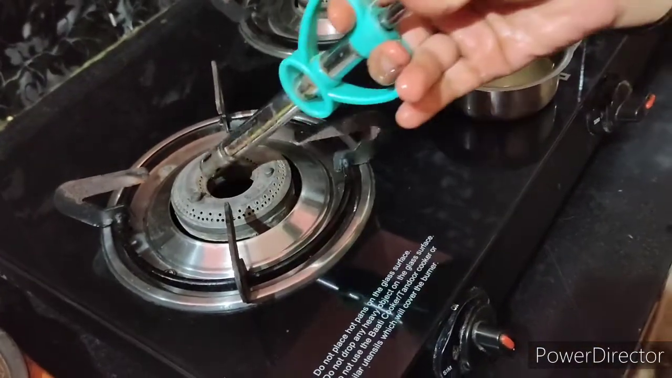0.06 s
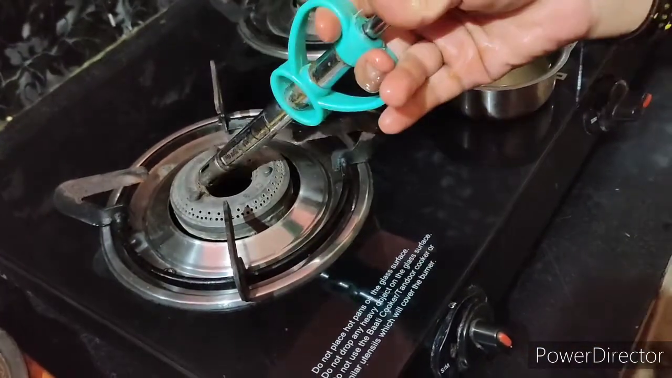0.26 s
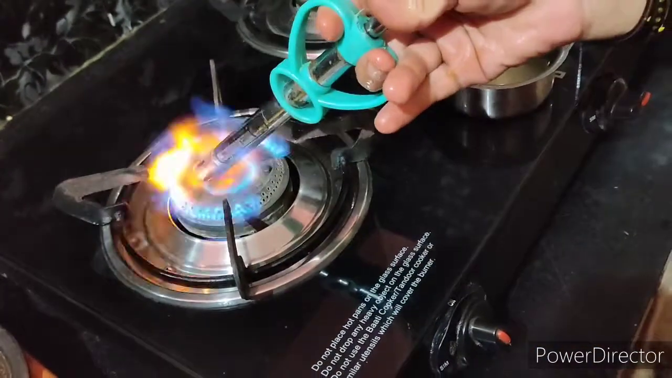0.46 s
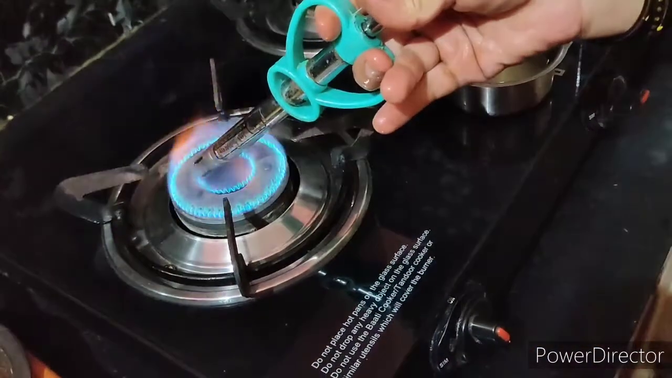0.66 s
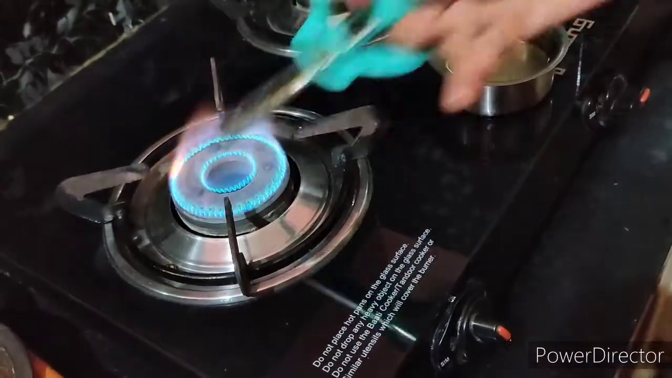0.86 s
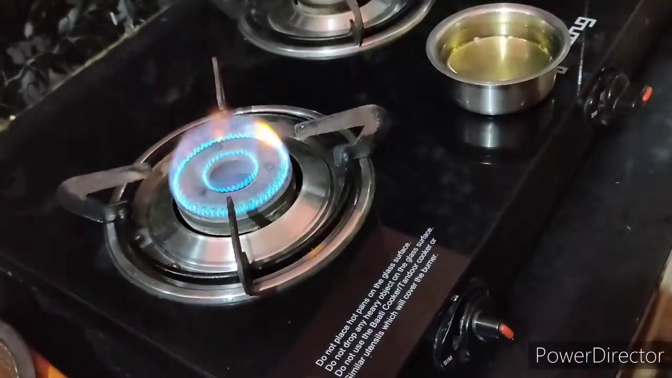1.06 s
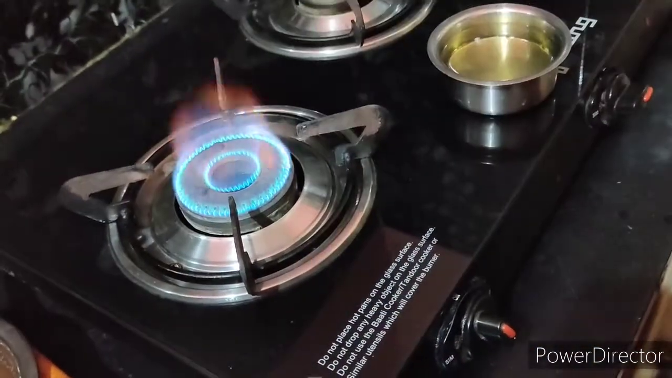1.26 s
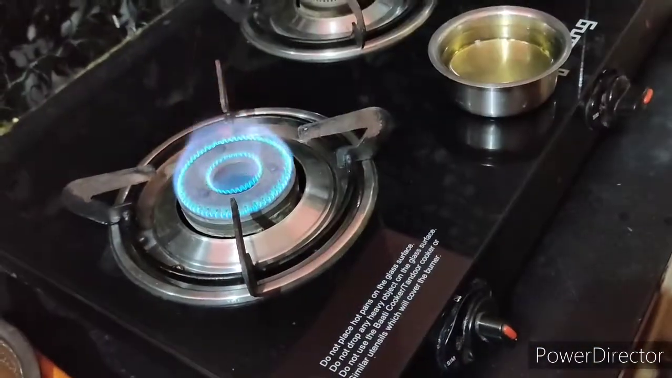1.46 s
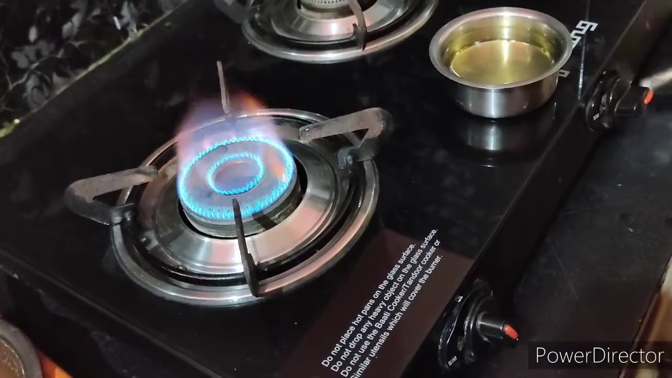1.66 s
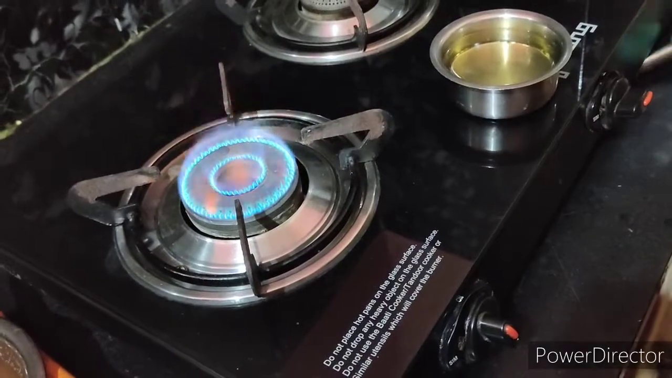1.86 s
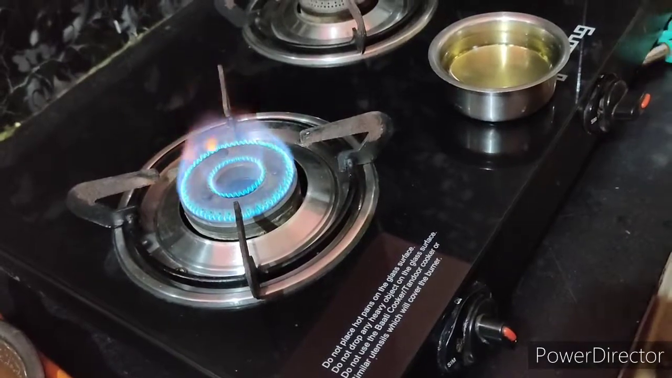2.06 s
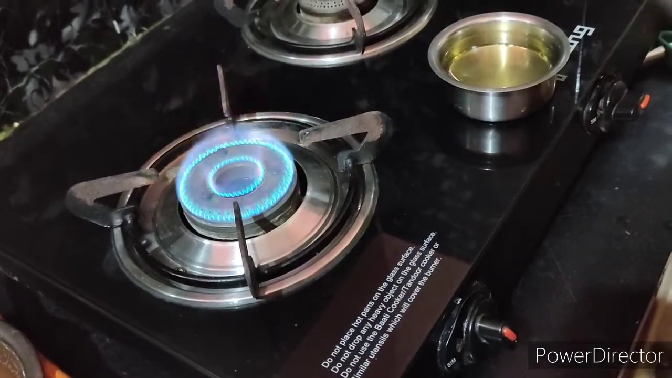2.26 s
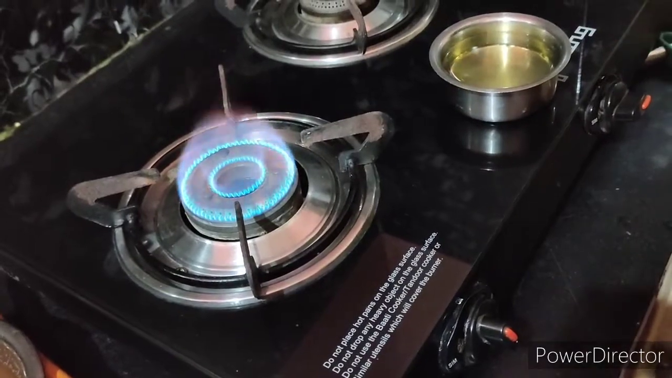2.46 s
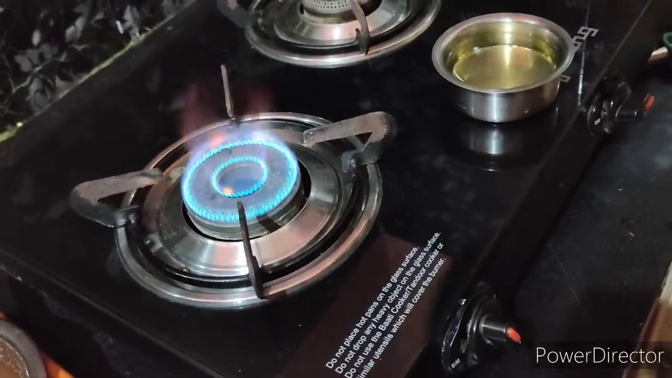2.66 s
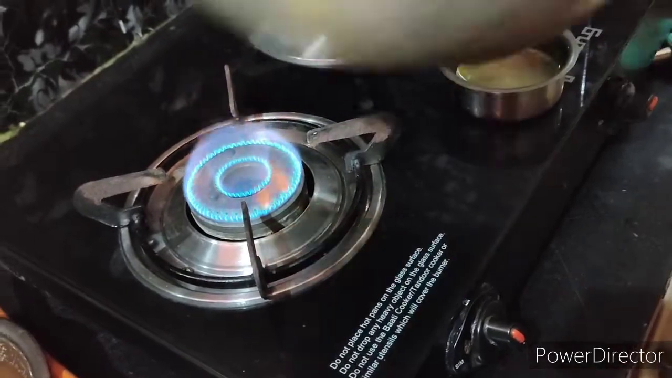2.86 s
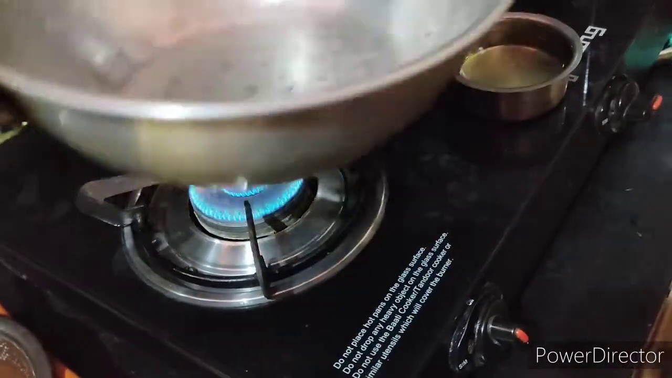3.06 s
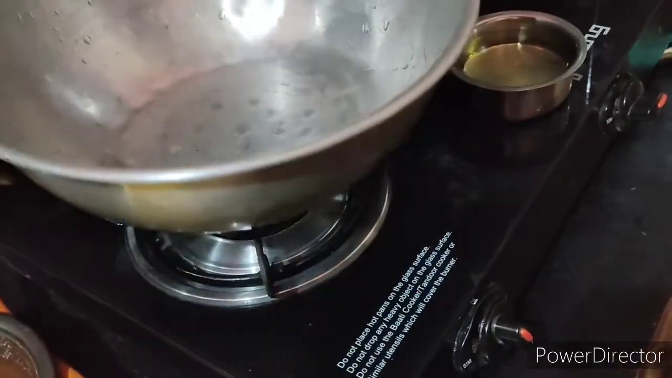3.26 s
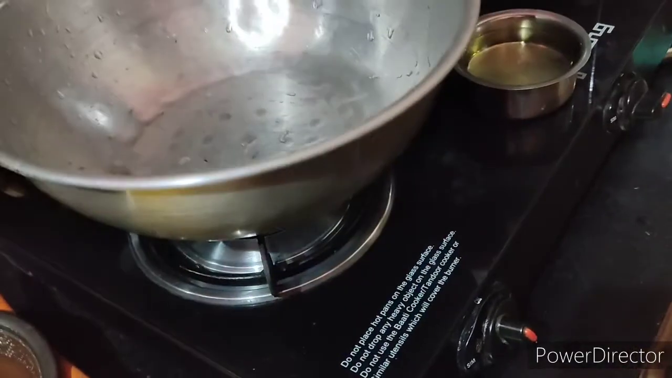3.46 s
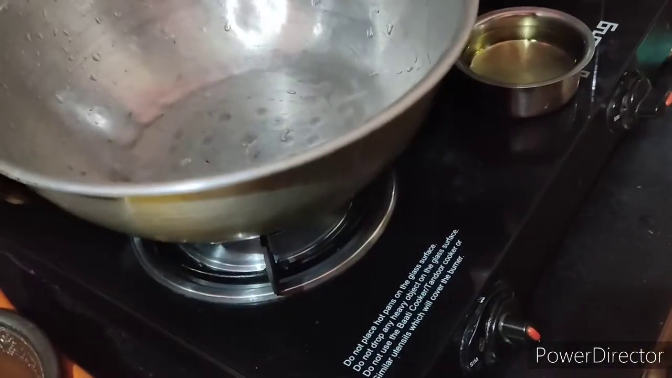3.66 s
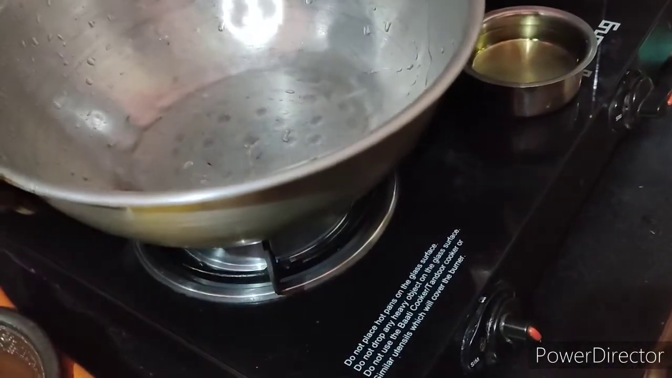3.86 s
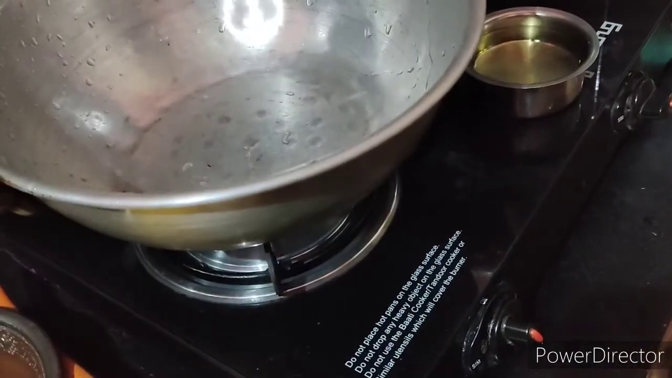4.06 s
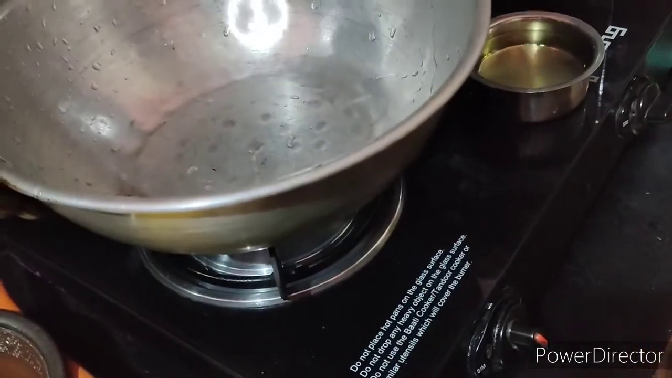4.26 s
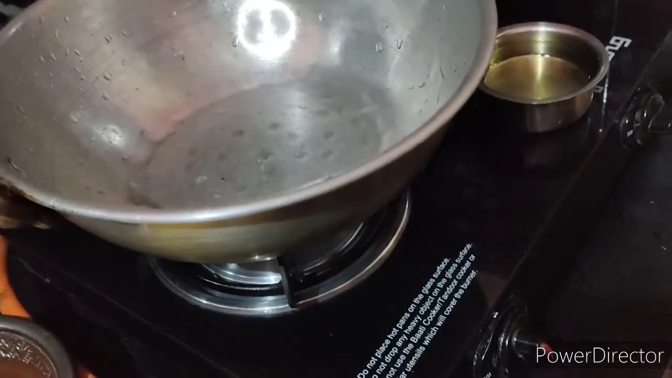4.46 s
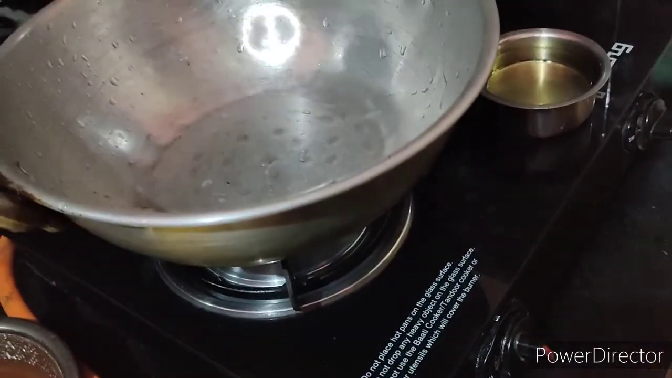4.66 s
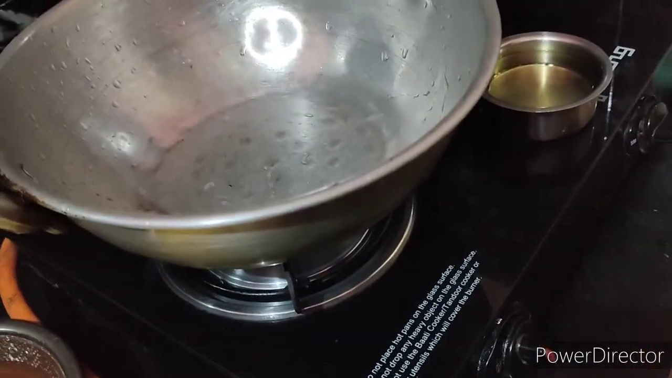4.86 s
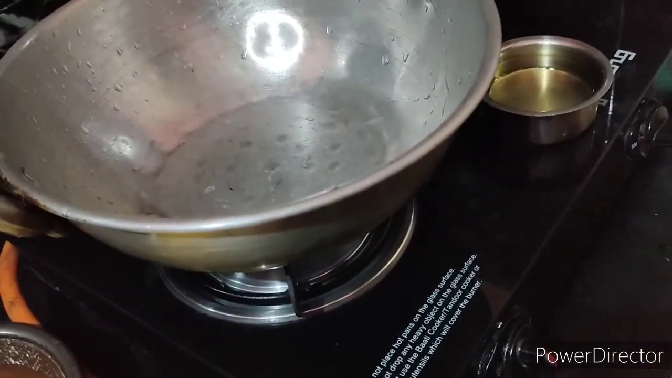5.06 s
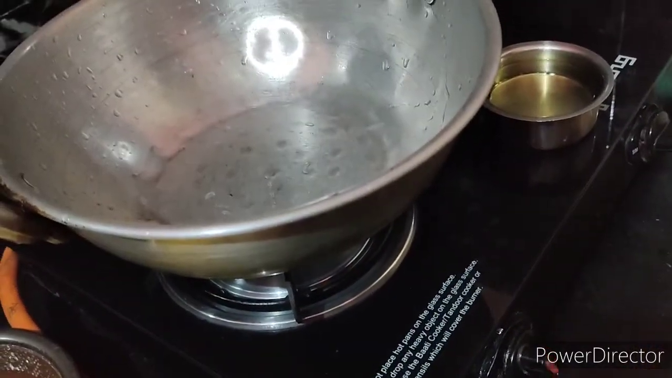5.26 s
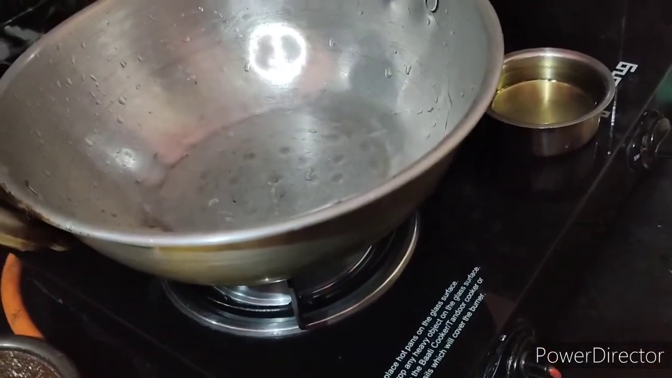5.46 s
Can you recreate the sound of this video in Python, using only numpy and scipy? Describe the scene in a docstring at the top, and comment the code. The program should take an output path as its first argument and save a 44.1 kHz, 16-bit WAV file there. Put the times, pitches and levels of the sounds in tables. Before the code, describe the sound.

A small, hard-walled kitchen is heard close up through a phone microphone, with a faint electrical hum and thin gas hiss throughout. After a soft touch of metal on the burner, a spark lighter snaps at about 0.5 seconds, sharp and metallic, by far the loudest sound. The gas lights at once with a low puff, then a quiet flutter that settles. The trigger ticks back near 0.9 seconds, and bangles tinkle faintly from 1 to 1.5 seconds. At 1.8 seconds the lighter knocks onto the counter with a clink, rocking more softly until 2.2. The bangles jingle again around 2.4 seconds. At 3.5 seconds a wide metal pan clanks onto the stove, ringing briefly over a low thud, then rocks into place with lighter clatters near 3.9. One more faint bangle tinkle comes at 4.9 seconds, leaving hum and hiss until about 5.5.

```python
"""A small hard-walled kitchen, heard close up through a phone with two unlike microphone ports.
A spark lighter's hammer snaps at a gas burner; the gas puffs alight, flares and settles. The lighter
clatters onto the counter, bangles tinkle, and a wide metal pan clanks onto the stove and rocks to rest.
Each hit is a noise crack, a short room tail and the object's ringing modes.
Mains hum, gas hiss and a few dull bumps lie underneath."""
import sys
import numpy as np
from scipy import signal
from scipy.fft import rfft, irfft, next_fast_len
from scipy.io import wavfile
from scipy.ndimage import map_coordinates

SR = 44100
rng = np.random.default_rng(int(sys.argv[2]) if len(sys.argv) > 2 else 0)


def log_audio(samples):
    """Write samples as a 16-bit WAV file to the path given in sys.argv[1]."""
    # one column per channel
    frames = np.atleast_2d(samples).T
    # limit to full scale, then quantise
    limited = np.clip(frames, -1, 1)
    pcm = np.round(limited * 32767).astype(np.int16)
    wavfile.write(sys.argv[1], SR, pcm)


N = 242945


def amp(db):
    return 10 ** (np.asarray(db) / 20)


def unit_rms(x):
    return x / np.sqrt(np.mean(x ** 2) + 1e-20)


def along(points, hz):
    """Read a breakpoint curve on a log frequency axis."""
    freqs, values = np.transpose(points)
    return np.interp(np.log(hz + 1), np.log(freqs + 1), values)


def automation(rows):
    """One per-sample curve for each column after the time."""
    times, *columns = np.transpose(rows)
    return [np.interp(np.arange(N) / SR, times, column) for column in columns]


def wobble(rate):
    """Smooth random drift, rate knots a second."""
    return map_coordinates(rng.standard_normal(int(N * rate / SR) + 4), [np.arange(N) * rate / SR])


def filtered(x, response):
    """EQ x with a gain given as a function of frequency."""
    size = next_fast_len(x.shape[-1] + 4096)
    return irfft(rfft(x, size) * response(np.fft.rfftfreq(size, 1 / SR)), size)[..., :x.shape[-1]]


def add(track, start_s, x):
    """Mix x into the track."""
    part = track[..., round(start_s * SR):][..., :x.shape[-1]]
    part += x[..., :part.shape[-1]]


# Stereo image of the air (frequency [Hz], left-right correlation [-1..1])
PORT_LIKENESS = [(60, 0.87), (160, 0.93), (430, 0.44), (1150, -0.079), (3060, -0.038), (8190, 0.048)]

def air(colour, size=N, boost_db=lambda hz: 0):
    """Unit-rms noise, centred bass and wide treble; colour is (frequency [Hz], level [dB])."""
    def mid_side(hz):
        width = np.arccos(np.clip(along(PORT_LIKENESS, hz), -1, 1)) / 2
        return amp(along(colour, hz) + boost_db(hz)) * [np.cos(width), np.sin(width)]
    mid, side = filtered(rng.standard_normal((2, size)), mid_side)
    return unit_rms(np.array([mid + side, mid - side]))


def ring(modes, t, scatter_db, decay_scale=1, waver_db=0):
    """Decaying modes at a random strength in each port; the waver stands for wall echoes."""
    out = np.zeros((2, len(t)))
    for hz, db, t60 in modes:
        life = t60 * decay_scale
        age = t[t < life]
        waver = np.interp(age * 30, np.arange(90), rng.standard_normal(90))
        phase = 2 * np.pi * (hz * age + rng.random((2, 1)) * (hz > 1000))  # low modes start in phase
        strength = amp(db + rng.normal(0, scatter_db, (2, 1)))
        add(out, 0, strength * amp(waver_db * waver - 60 * age / life) * np.sin(phase))
    return out


# Room tail (frequency [Hz], t60 [s])
KITCHEN_DECAY = [(100, 0.35), (300, 0.59), (1000, 0.51), (2500, 0.51), (4000, 0.49), (6500, 0.45),
                 (8000, 0.42)]

def strikes(hits, colour, modes, decay_scale, crack_db, punch_db, scatter_db, pan_db, size=18000):
    """Impacts: crack, mid punch, room tail and ring. A hit's body gain tilts it below 2 kHz."""
    out, t = np.zeros((2, N)), np.arange(size) / SR
    lows = lambda hz: 1 / (1 + (hz / 2000) ** 6)
    punch_colour = [(120, -33.5), (350, -21), (650, -1.5), (1500, -9), (3500, -22.5)]
    crack_t60, tick_t60, sharp_rise_s = .044, .0054, .0025
    for start, db, body_db, ring_db, rise in hits:
        noise = air(colour, size, boost_db=lambda hz: body_db * lows(hz))
        noise /= np.std(filtered(noise, lambda hz: 1 - lows(hz)))  # the treble sets the level
        band_hz, age, bands = signal.stft(noise, SR, nperseg=256)
        room_t60 = decay_scale * along(KITCHEN_DECAY, band_hz)[:, None]
        tail = signal.istft(bands * amp(-60 * age / room_t60), SR, nperseg=256)[1][:, :size]
        punch = amp(punch_db + body_db) * air(punch_colour, size)
        crack = (amp(crack_db) * noise + punch) * amp(-60 * t / crack_t60)
        tick = amp(2 - 60 * t / tick_t60) * noise * (rise < sharp_rise_s)
        struck = [(hz, level + ring_db + body_db * lows(hz), t60) for hz, level, t60 in modes]
        ringing = ring(struck, t, scatter_db, decay_scale, waver_db=3.5)
        attack = 1 - np.exp(-t / rise)
        gain = amp(db - 7.5 + pan_db / 2 * np.array([[1], [-1]]))
        add(out, start, gain * (attack * (tail + crack + ringing) + tick))
    return out


def mains_hum():
    """Twice the mains frequency, beating with a second hum and with noise trapped in a room mode."""
    hum_hz, beat_hz, dip_s = 100.14, 1.507, 2.442
    t = np.arange(N) / SR
    phase = 2 * np.pi * hum_hz * t + 1.3
    tones = np.sin(phase) - amp(-9) * np.sin(phase - 2 * np.pi * beat_hz * (t - dip_s))
    trapped = air([(62, -30), (80, -17), (89, -5), (93.5, 3.5), (97, -8), (108, -12), (114, -40.5)])
    return amp(-56.5) * (np.sqrt(2) * tones + amp(-7.5) * trapped)


# Low rush and bright hiss (frequency [Hz], level [dB])
RUSH_COLOUR = [(110, -39.5), (180, -16.5), (247, -2), (274, -5.5), (356, -9), (470, -12), (551, -16.5),
               (597, -14), (1200, -27.5), (1560, -55.5), (2640, -120)]
HISS_COLOUR = [(530, -35.5), (900, -8.5), (1110, -17.5), (1210, -15.5), (1310, -15.5), (1770, -16.5),
               (2690, -21.5), (2950, -16), (3860, -17.5), (5050, -17), (7040, 3), (7700, -4), (10000, -32),
               (16900, -120)]
# Fader ride on the rush (time [s], level [dB])
RUSH_RIDE = [(0, -76), (.5, -67.5), (.6, -62), (.8, -67), (1.2, -65), (1.7, -68), (2.1, -64), (2.6, -72.5),
             (3.4, -69.5), (3.7, -63), (4.1, -67.5), (4.5, -68.5), (5.5, -73)]
# Whistle glide (time [s], pitch [Hz], level [dB])
WHISTLE_GLIDE = [(4.85, 544, -93.5), (4.9, 532, -76.5), (5.15, 575, -68.5), (5.27, 597, -70),
                 (5.5, 589, -72.5)]

def gas_flow():
    """The gas bed: a drifting rush, a thin hiss and, late on, a faint fuzzy tone creeping upward."""
    rush = amp(automation(RUSH_RIDE)[0] + 3.8 * wobble(8.3)) * air(RUSH_COLOUR)
    hz, db = automation(WHISTLE_GLIDE)
    fuzz = unit_rms(filtered(rng.standard_normal((2, N)), lambda f: 1 / (1 + (f / 28) ** 2)))
    gate = np.arange(N) > WHISTLE_GLIDE[0][0] * SR
    whistle = amp(db) * gate * fuzz * np.sin(2 * np.pi * np.cumsum(hz) / SR)
    hiss = amp(-66.5 + wobble(3.3)) * air(HISS_COLOUR)
    return rush + whistle + hiss


# Dull bumps (time [s], level [dB], body [dB], ring [dB], rise [s])
BUMP_HITS = [(2.835, -81.5, 18.5, -3, 0.016), (2.9, -83, 21, -7.5, 0.013), (3.02, -89.5, 19.8, -0.5, 0.01)]
# Their muffled noise (frequency [Hz], level [dB])
BUMP_COLOUR = [(100, -40), (200, -1), (330, -6), (600, -9), (1000, -17), (1600, -27), (2500, -27),
               (7700, -37.5)]
# Their low ring (frequency [Hz], level [dB], t60 [s])
BUMP_MODES = [(274, 16, 0.37), (343, 22.5, 0.26)]

def dull_bumps():
    """Dull, soft-edged bumps that ring two low modes."""
    return strikes(BUMP_HITS, BUMP_COLOUR, BUMP_MODES, decay_scale=1,
                   crack_db=-14, punch_db=-14, scatter_db=5, pan_db=-2.5)


# Weight landing (time [s], level [dB])
STOVE_LOADS = [(1.762, -49.5), (2.011, -53), (2.191, -53), (3.489, -33.5), (3.869, -33.5), (3.962, -36),
               (4.149, -59), (4.56, -50)]
# Stove top and floor resonances (frequency [Hz], level [dB], t60 [s])
STOVE_MODES = [(91.8, 0, 0.96), (101, 1, 0.45), (107.1, -4.5, 0.47)]
FLOOR_MODES = [(36.94, -42, 1.78)]
THUD_S = 4.55

def low_thuds():
    """Landing weight bounces the stove top on its lowest modes; a far thud rings the floor."""
    out, t = np.zeros((2, N)), np.arange(SR) / SR
    for start, db in STOVE_LOADS:
        add(out, start, amp(db) * (1 - np.exp(-t / .045)) * ring(STOVE_MODES, t, scatter_db=.8))
    add(out, THUD_S, (1 - np.exp(-t / .033)) * ring(FLOOR_MODES, t, scatter_db=.3))
    return out


# Bangle contacts (time [s], level [dB], note [Hz], note level [dB])
BANGLE_HITS = [(1.019, -57.5, 5500, -63), (1.041, -52.5, 5700, -64), (1.159, -55, 4840, -75),
               (1.381, -49, 5850, -60), (1.408, -52, 5800, -61), (1.488, -57, 5520, -69),
               (2.33, -49.5, 6020, -61), (2.345, -46.5, 5120, -56), (2.369, -48, 5820, -51),
               (2.399, -60, 5160, -61), (2.429, -65, 5820, -57), (2.555, -58, 6230, -62),
               (4.892, -48, 6060, -54), (4.918, -53, 4930, -73)]
# Their bright sizzle (frequency [Hz], level [dB])
BANGLE_COLOUR = [(3500, -39), (4500, -26), (4900, -10), (5500, -3.5), (6000, 7.5), (7000, 0), (7600, 0),
                 (9000, -23)]
# Shimmer of the bunch (frequency [Hz], level [dB], t60 [s])
BANGLE_MODES = [(5040, -10, .2), (5300, -5, .2), (5700, -14, .25), (5720, -0.5, 0.71), (6000, -12, .25),
                (6350, -6, .2), (6960, -4.5, .15), (7700, 2.5, .15)]

def bangles():
    """Each touch jingles the whole bunch and leaves one bangle's note singing."""
    body_db, ring_db, rise_s, note_t60 = -27, -15, .0017, .27
    hits = [(start, db, body_db, ring_db, rise_s) for start, db, *_ in BANGLE_HITS]
    out = strikes(hits, BANGLE_COLOUR, BANGLE_MODES, decay_scale=.8,
                  crack_db=-10.5, punch_db=-36, scatter_db=6, pan_db=1, size=8000)
    t = np.arange(SR // 4) / SR
    for start, _, hz, db in BANGLE_HITS:
        note = ring([(hz, db, note_t60)], t, scatter_db=1.3, waver_db=4.5)
        add(out, start, (1 - np.exp(-t / rise_s)) * note)
    return out


# Light contacts (time [s], level [dB], body [dB], ring [dB], rise [s])
TOUCH_HITS = [(.3612, -51.5, 6.7, -36, 0.0011), (.84, -75.5, 13, 9, 0.013), (4.148, -80, 19.3, -32, 0.0044)]
# Their mid-heavy noise (frequency [Hz], level [dB])
TOUCH_COLOUR = [(88, -44), (150, -14.5), (295, -18), (377, -6), (561, -1.5), (650, -7), (1320, -10),
                (1810, -23), (2730, -16), (4930, -36.5), (6640, -19.5), (7700, -30.5), (10000, -60),
                (16900, -120)]
# Burner ring (frequency [Hz], level [dB], t60 [s])
BURNER_MODES = [(533, -2, .3), (655, -10, 0.19), (802, -9, .2), (1157, -11, .2), (1335, -13, 0.18)]

def burner_touches():
    """Metal touches the burner softly and rings it briefly."""
    return strikes(TOUCH_HITS, TOUCH_COLOUR, BURNER_MODES, decay_scale=.88,
                   crack_db=4.5, punch_db=-13, scatter_db=2, pan_db=-1)


# Lighter on the counter (time [s], level [dB], body [dB], ring [dB], rise [s])
TAP_HITS = [(1.7567, -31, -3, -2.5, .0016), (2.0065, -41.5, 4, -3.5, 0.0013), (2.14, -59, 11.5, -3, 0.018),
            (2.18, -58.5, 13.5, -6, 0.0058), (2.21, -55.5, 1, 9, 0.0048)]
# Clatter noise (frequency [Hz], level [dB])
TAP_COLOUR = [(59, -34), (100, -9), (158, -28.5), (248, -16), (405, -13), (583, -4.5), (766, -15),
              (1040, -12.5), (1500, -23), (2300, -29), (3500, -25), (4200, -21), (4900, -29), (6000, -21.5),
              (6500, -6.5), (7000, -17), (7700, -14.5), (10000, -48)]
# Counter ring (frequency [Hz], level [dB], t60 [s])
COUNTER_MODES = [(258, -6.5, 0.74), (509, -2, 0.25), (584.5, -5.5, 0.35), (882, -9, 0.29),
                 (1110, -13, 0.19), (1240, -23, 0.15), (1390, -12, .2), (2770, -20, 0.13), (4050, -20, .15),
                 (4300, -19, .3), (4450, -19, .15), (6450, -15, 0.39), (7430, -8, 0.25)]

def counter_taps():
    """The lighter is laid down and rocks, knocking on the counter."""
    return strikes(TAP_HITS, TAP_COLOUR, COUNTER_MODES, decay_scale=.98,
                   crack_db=-23, punch_db=-.5, scatter_db=4, pan_db=-1.6)


# Clinks as the lighter is laid down (time [s], level [dB])
CLINK_HITS = [(1.7567, -28), (2.0065, -41.5), (2.205, -52.5)]

def barrel_clinks():
    """Two close modes in the lighter's barrel beat as they die: one mono tone with a tremolo."""
    centre_hz, beat_hz, t60 = 6592, 14.5, .32
    out, t = np.zeros((2, N)), np.arange(SR // 3) / SR
    tremolo = np.sin(np.pi * (beat_hz * t + .03))
    for start, db in CLINK_HITS:
        add(out, start, tremolo * ring([(centre_hz, db, t60)], t, scatter_db=.8, waver_db=-2.9)[0])
    return out


# Pan landing, then rocking (time [s], level [dB], body [dB], ring [dB], rise [s])
CLANK_HITS = [(3.4868, -30.5, -2, 0.97, 0.0011), (3.609, -47, 0, 1.5, 0.0024)]
ROCK_HITS = [(3.835, -55.5, 8.5, 5, 0.0028), (3.862, -44, -2.5, 3.5, 0.0047),
             (3.9446, -41, -6, 4.3, 0.0025)]
# Contact noise of each (frequency [Hz], level [dB])
CLANK_COLOUR = [(59, -39), (100, -1.5), (160, -13.5), (504, -7.5), (687, -6), (766, -7), (1180, -8.5),
                (1390, -18.5), (1530, -9.5), (1830, -23), (2080, -23), (5350, -26.5), (6780, -11),
                (7700, -17), (10000, -47.5), (16900, -120)]
ROCK_COLOUR = [(88, -43), (150, -21), (242, 2.5), (348, -11), (468, -5), (846, -18.5), (1660, -19.5),
               (1930, -33.5), (2680, -28), (3220, -30), (3490, -28), (4930, -30.5), (6750, -17.5),
               (7700, -22), (10000, -59.5), (16900, -120)]
# Pan ring (frequency [Hz], level [dB], t60 [s])
PAN_MODES = [(192, -10.5, 0.75), (245.4, -12.5, 2), (336, -11.5, 0.76), (393, -11.5, 0.68),
             (462, -16, 0.23), (532, -10.5, 0.64), (646, -15.5, 0.67), (778, -13.5, 0.29), (856, -27, .31),
             (983, -13, 0.26), (1080, -12, .2), (1168, -10, .37), (1310, -22.5, 0.3), (1520, -16, 0.5),
             (2010, -20.5, 0.52), (2160, -21.5, 0.4), (2584, -22.5, 0.98), (2700, -16, 0.31),
             (2880, -24, .2), (3400, -24, 0.46), (3435, -20.5, .26), (3650, -17, .2), (4050, -27.5, .5),
             (4320, -27, .3), (4660, -20, .2), (5410, -15.5, 0.33), (6300, -6, .25), (6200, -11, 0.28),
             (6600, -16, 0.2), (6600, -3, 0.21), (7120, -23, 0.27)]

def metal_pan():
    """The pan bounces on the pot rests, is nudged and rocks into place, damped by the rests."""
    landing = strikes(CLANK_HITS, CLANK_COLOUR, PAN_MODES, decay_scale=.9,
                      crack_db=-8, punch_db=-8, scatter_db=4.5, pan_db=-2.3, size=24000)
    damped = [(hz, db, .55 * t60) for hz, db, t60 in PAN_MODES]
    rocking = strikes(ROCK_HITS, ROCK_COLOUR, damped, decay_scale=.83,
                      crack_db=-11, punch_db=-13, scatter_db=5.5, pan_db=-1)
    return landing + rocking


# Room boom under the puff (frequency [Hz], level [dB], t60 [s])
ROOM_MODES = [(24.7, -42, 1.69), (34.23, -49.5, 1.4), (76.5, -40.5, 0.9), (131, -39, .7),
              (183.3, -47, 0.72), (252, -51, .5), (470, -47, .7)]

def flame():
    """The gas lights with one pressure push that rings the room; flutter and roar flare and settle."""
    lit_s, puff_hz, rise_s, decay_s = .5403, 38, .001, .0095
    t = np.arange(N) / SR
    age = np.maximum(t - lit_s, 0)

    def flare(unlit_db, burning_db, flare_db, settle_s):
        return amp(np.where(age > 0, burning_db + flare_db * np.exp(-age / settle_s), unlit_db))

    push = (1 - np.exp(-age / rise_s)) * np.exp(-age / decay_s)
    puff = push * np.cos(2 * np.pi * puff_hz * age) * amp([[-11.5], [2]])  # leans right
    boom = (1 - np.exp(-age / .023)) * ring(ROOM_MODES, age, scatter_db=.76)
    # after the far thud, a rumble swells in the same low noise, holds and cuts off
    rumble = amp(-60) * np.interp(t - THUD_S, [0, .3, .7], [0, 1, 1], right=0)
    flutter = air([(12, -29.5), (24, 13.5), (55, -3), (75, -50.5)])
    flutter *= flare(unlit_db=-67.5, burning_db=-65, flare_db=12, settle_s=.93) + rumble
    roar = air([(60, -31), (80, -4), (130, 0), (190, -6.5), (230, -38.5)])
    roar *= flare(unlit_db=-79.5, burning_db=-75.5, flare_db=16.5, settle_s=.6) + amp(-14) * rumble
    return puff + boom + flutter + roar


# Hammer and trigger (time [s], level [dB], body [dB], ring [dB], rise [s])
HAMMER_HITS = [(.5403, -12.5, -1, -7.5, 0.00043), (.5505, -18.5, -9, -13.5, 0.0016)]
TRIGGER_HITS = [(.9323, -47, -7, 7.7, 0.00023)]
# Snap noise (frequency [Hz], level [dB])
SNAP_COLOUR = [(59, -40.5), (100, -9), (190, -11.5), (253, -8.5), (391, -24.5), (469, -15), (616, -23.5),
               (2300, -30.5), (2900, -25.5), (3860, -14), (4380, -22), (5550, -21.5), (6540, 0),
               (7700, -16), (10000, -47.5)]
# Barrel and spring ring (frequency [Hz], level [dB], t60 [s])
BARREL_MODES = [(543, 8, 0.059), (632, 10, 0.023), (935, -4.5, .05), (1580, 1, 0.024), (4100, -23.5, .35),
                (4400, -24.5, .33), (5399, -22, .25), (5857, -14.5, .27), (6870, -10, .18),
                (6110, -16, .29), (6200, -1, .2), (6600, -7, .18), (7150, -14.5, .3), (7210, -8.5, .28),
                (7320, -15, .24)]
SPRING_MODES = [(2700, -6, .025), (5200, -7, .04), (7350, 4, .05)]

def spark_lighter():
    """The hammer snaps and bounces, ringing the barrel; the trigger springs back with a thin tick."""
    snap = strikes(HAMMER_HITS, SNAP_COLOUR, BARREL_MODES, decay_scale=.8,
                   crack_db=6.5, punch_db=-5.5, scatter_db=7.5, pan_db=1.5, size=24000)
    release = strikes(TRIGGER_HITS, SNAP_COLOUR, SPRING_MODES, decay_scale=.45,
                      crack_db=-13, punch_db=-12, scatter_db=.5, pan_db=-2.5, size=12000)
    return snap + release


def scene():
    """The stereo mix: hits over flame, gas and hum."""
    hits = spark_lighter() + counter_taps() + burner_touches() + metal_pan()
    details = dull_bumps() + barrel_clinks() + bangles() + low_thuds()
    return hits + details + flame() + gas_flow() + mains_hum()


# Port imbalance (frequency [Hz], left minus right [dB])
PORT_BALANCE = [(60, 4), (110, 3.5), (210, 5.5), (380, 3.5), (700, 0), (1300, -5.5), (2400, -2.5),
                (4430, 5.5), (8190, 6)]
# Converter roll-off (frequency [Hz], gain [dB])
HIGH_CUT = [(7600, 0), (7900, -13), (8050, -21), (8400, -39)]

def record(dry):
    """The phone: each port has its own EQ, peaks round off, the top is cut and faint hiss is added."""
    ceiling, top_hz, hiss_db = .97, 8500, -102
    hiss = filtered(rng.standard_normal(dry.shape), lambda hz: hz < 15200)
    coloured = filtered(dry, lambda hz: amp(along(PORT_BALANCE, hz) / 2 * np.array([[1], [-1]])))
    rounded = coloured / (1 + np.abs(coloured / ceiling) ** 5) ** (1 / 5)
    dulled = filtered(rounded, lambda hz: amp(along(HIGH_CUT, hz)) * (hz < top_hz))
    return dulled + amp(hiss_db) * hiss


dry = scene()
out = record(dry)
log_audio(out)
```